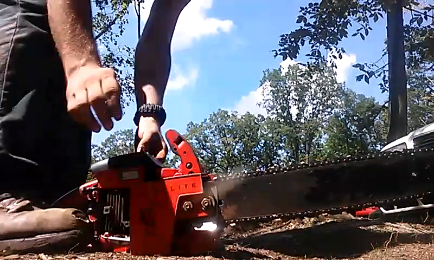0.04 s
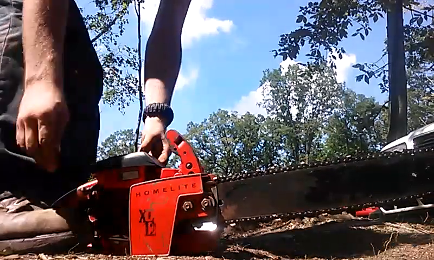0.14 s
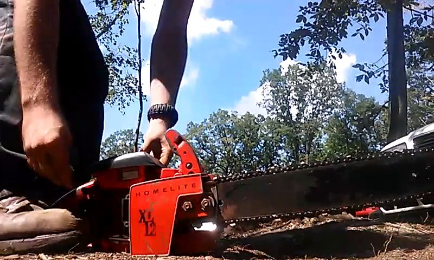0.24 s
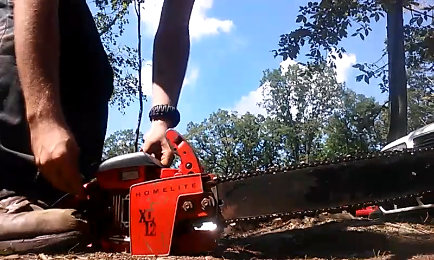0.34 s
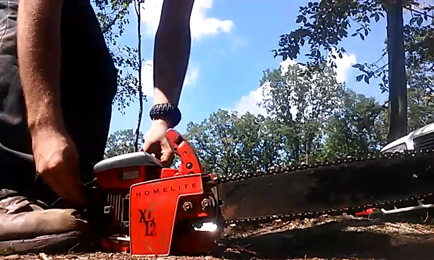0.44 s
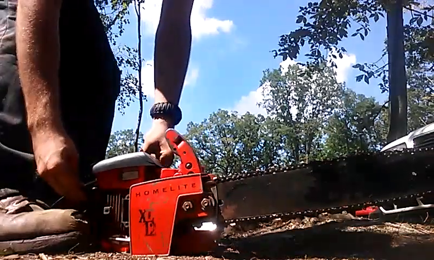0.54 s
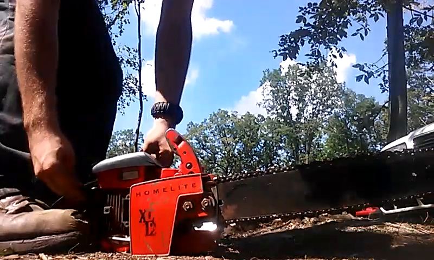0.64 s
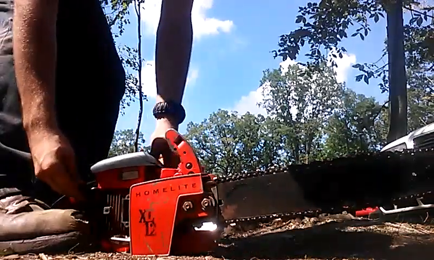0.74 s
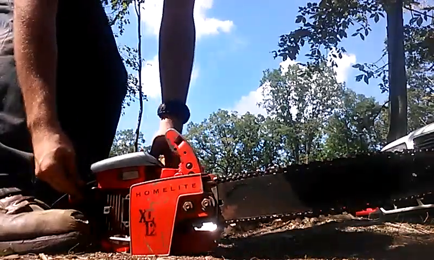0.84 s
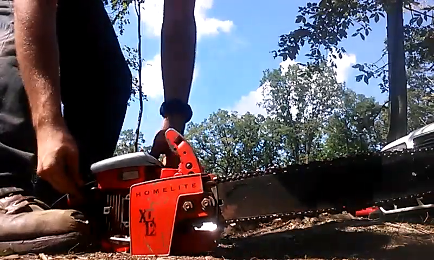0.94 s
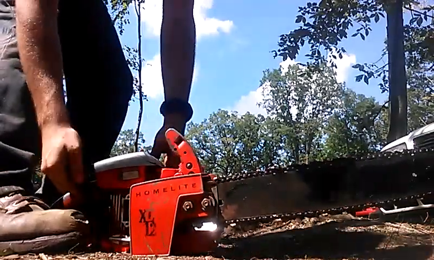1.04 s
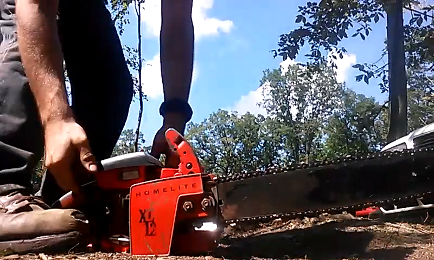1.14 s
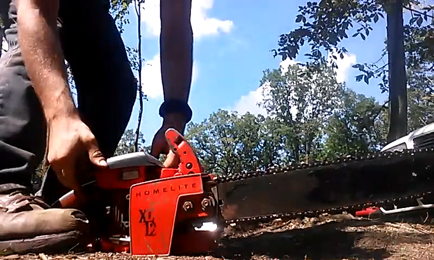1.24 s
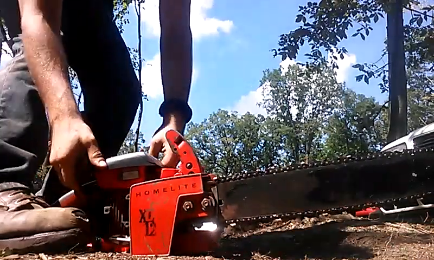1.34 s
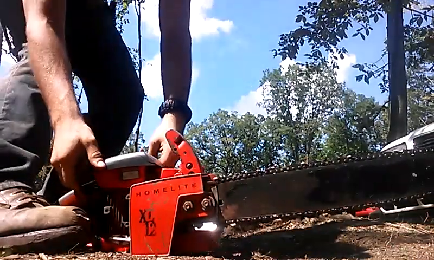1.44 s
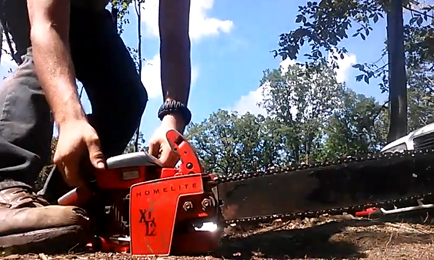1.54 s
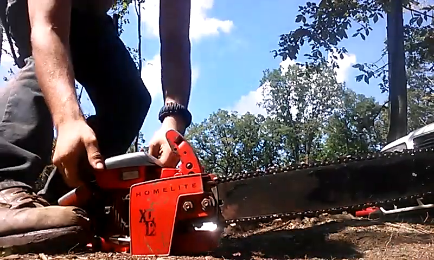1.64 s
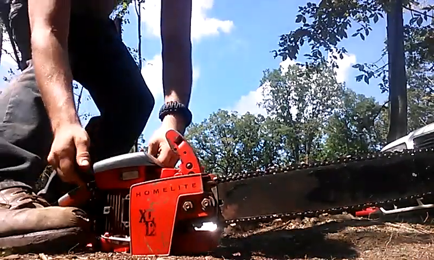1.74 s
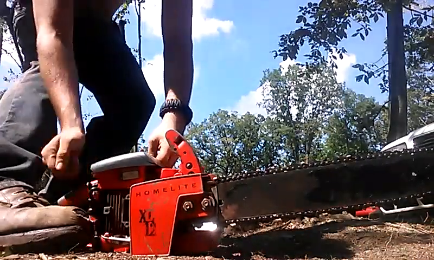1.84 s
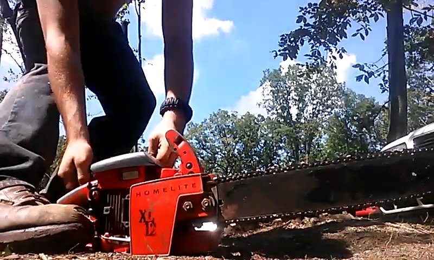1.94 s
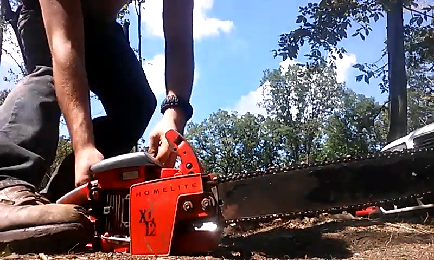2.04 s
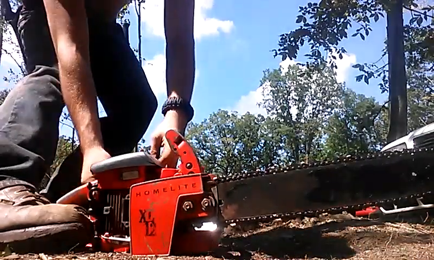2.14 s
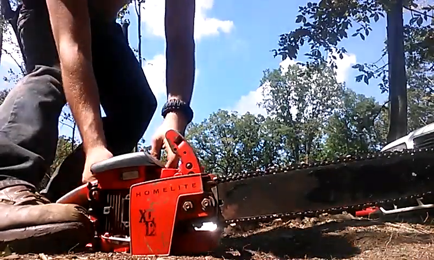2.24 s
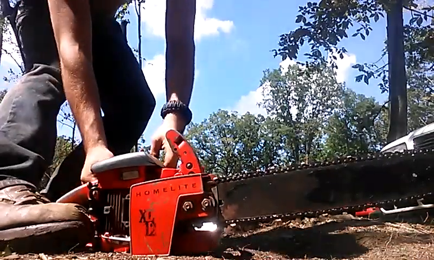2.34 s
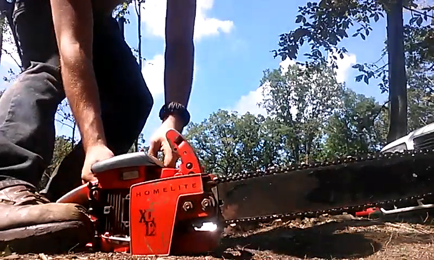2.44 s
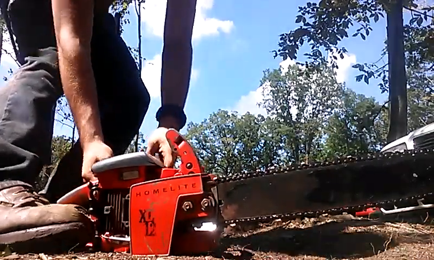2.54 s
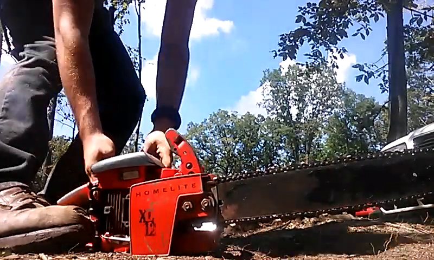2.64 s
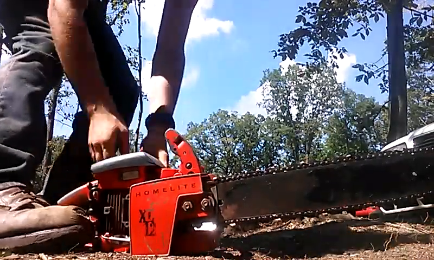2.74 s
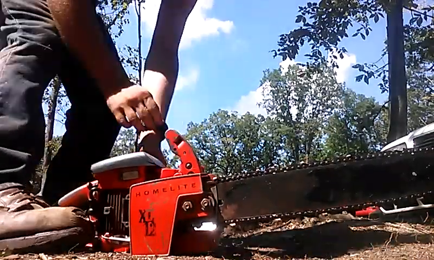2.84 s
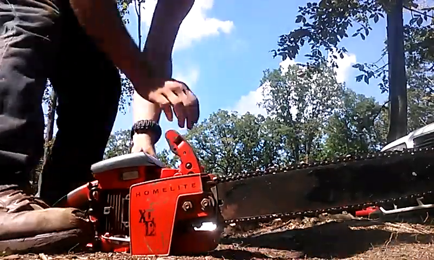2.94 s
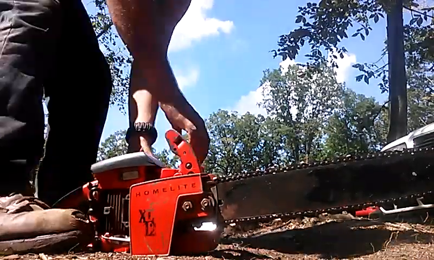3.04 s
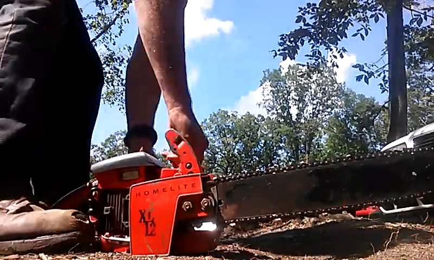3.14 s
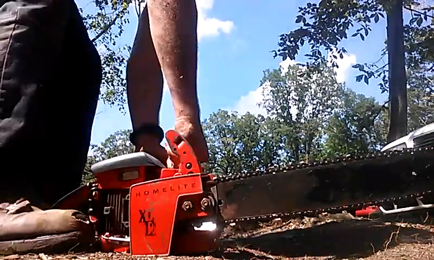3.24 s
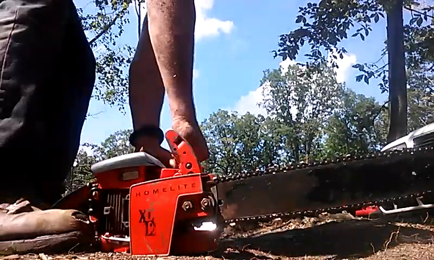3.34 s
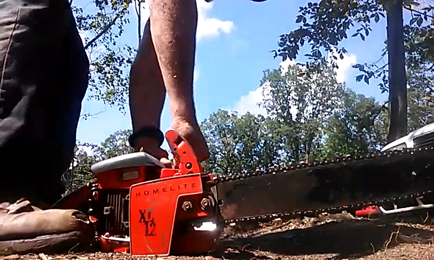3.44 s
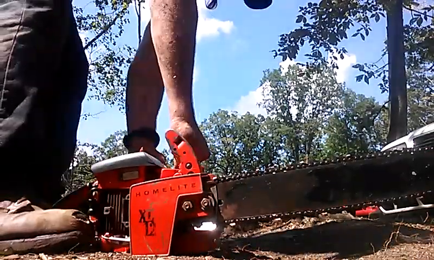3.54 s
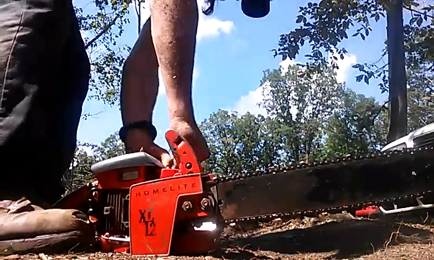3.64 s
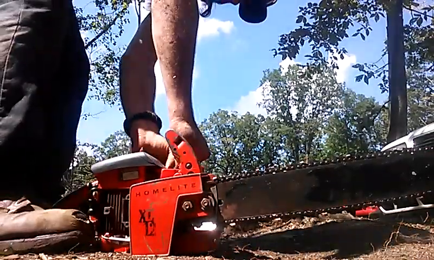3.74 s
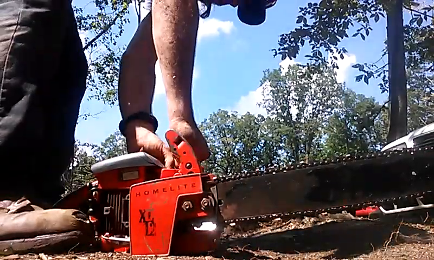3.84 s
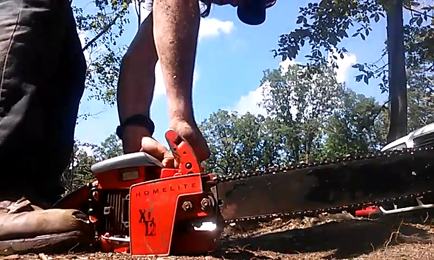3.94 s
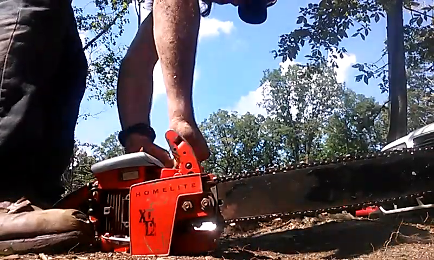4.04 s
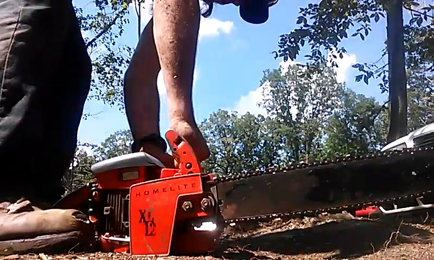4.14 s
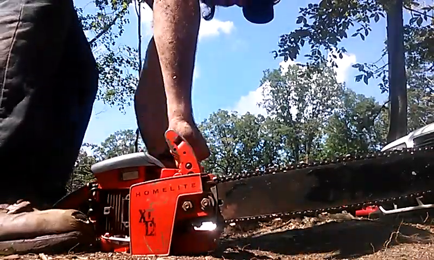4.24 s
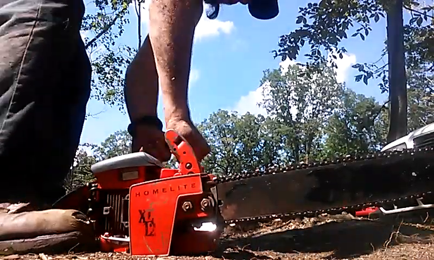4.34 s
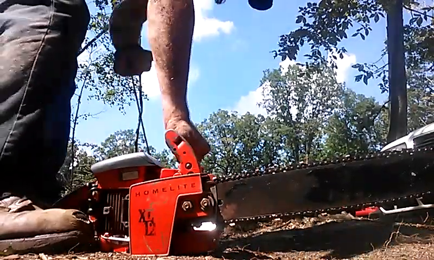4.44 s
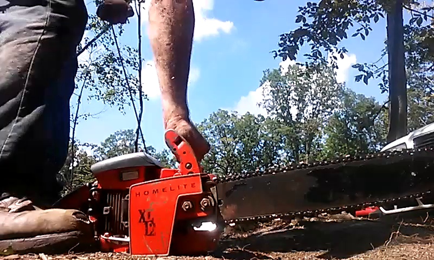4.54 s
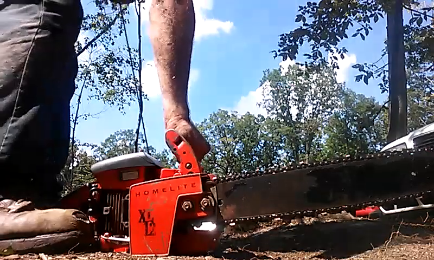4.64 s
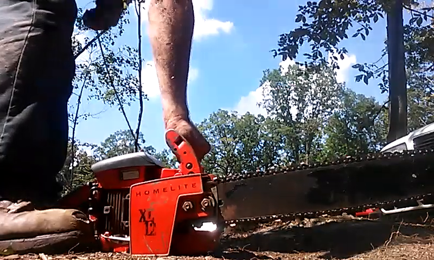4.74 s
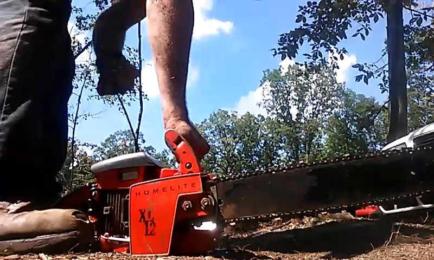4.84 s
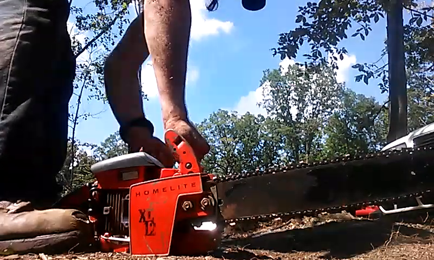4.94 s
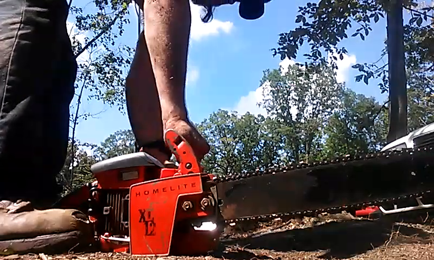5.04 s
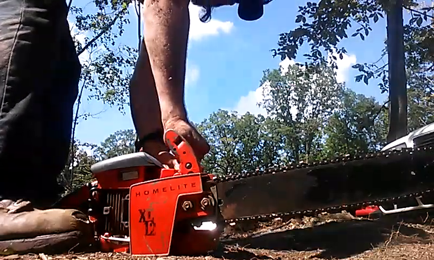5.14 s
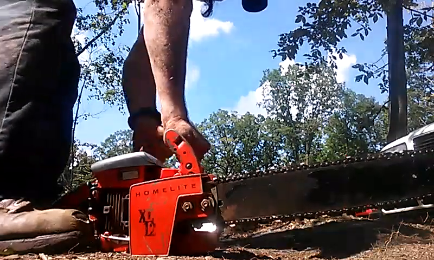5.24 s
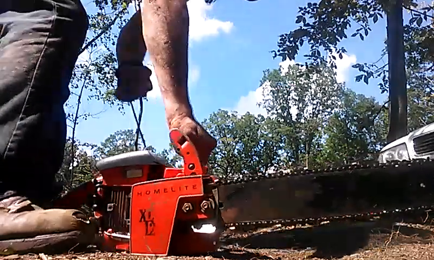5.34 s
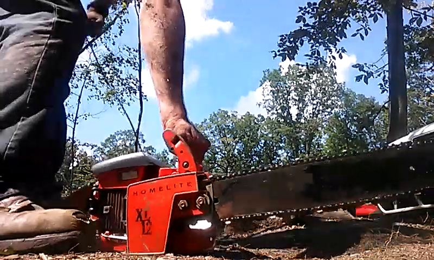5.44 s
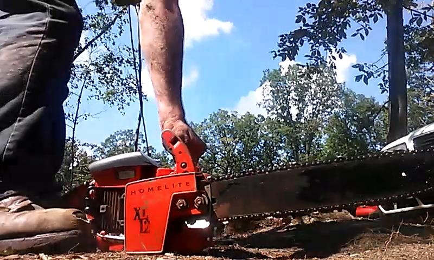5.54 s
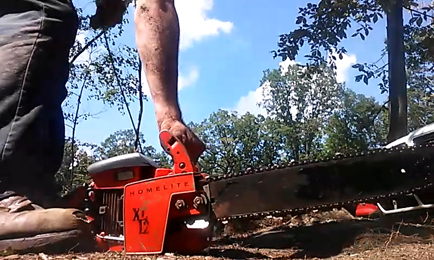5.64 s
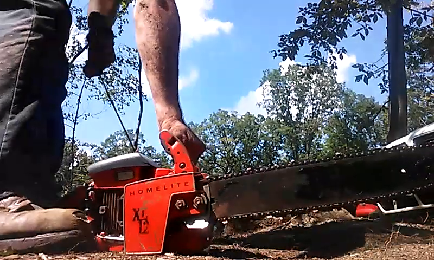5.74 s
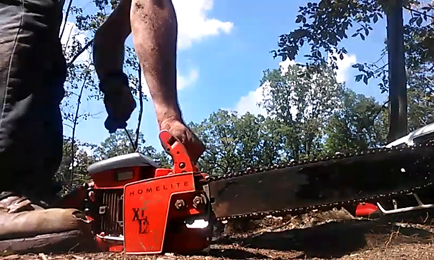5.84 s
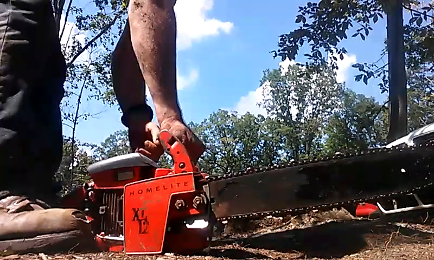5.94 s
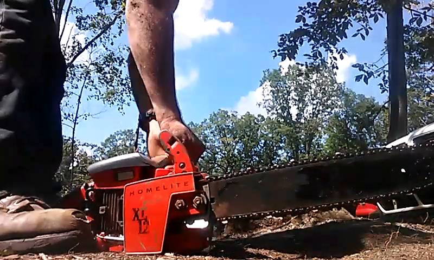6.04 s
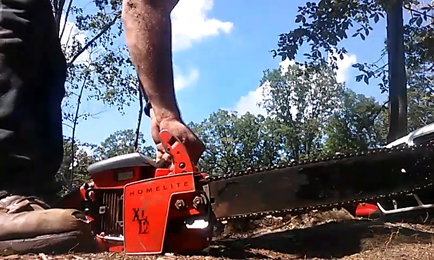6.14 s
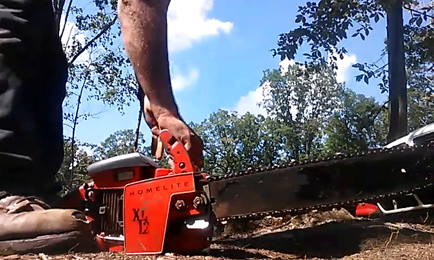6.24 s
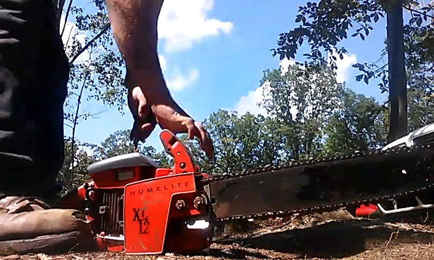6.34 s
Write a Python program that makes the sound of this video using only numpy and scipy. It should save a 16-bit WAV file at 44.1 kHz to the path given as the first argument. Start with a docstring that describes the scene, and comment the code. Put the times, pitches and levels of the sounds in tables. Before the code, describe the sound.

Outdoors, very close to the microphone, an unmuffled two-stroke chainsaw chugs down and stalls with a clank and brief metallic ring. Several seconds of near silence follow: faint pulsing insect, soft rustling, a dry switch click. Then a rope pull rattles and coughs without catching, a knock, and the next pull fires it into harsh, accelerating, overloaded popping that continues to the end.

```python
"""A chainsaw stalls and starts again

A two-stroke chainsaw without a muffler lies on the ground outdoors, close to the microphone. It coasts to a
stall, a switch clicks, a rope pull gives a few coughs, then it catches and gathers speed, firing every few turns.
Each turn of the crank is a set of short falling and rising tones plus hiss, as the exhaust port opens and shuts.
Firings add louder rings and gas noise, which overload the microphone. Shaped noise makes the metal parts,
an insect pulsing in the trees, rustling and air; the ground and trees send back faint echoes."""
import sys
import numpy as np
from scipy import signal
from scipy.fft import rfft, irfft, next_fast_len
from scipy.io import wavfile
from scipy.ndimage import uniform_filter1d

SR = 44100
rng = np.random.default_rng(int(sys.argv[2]) if len(sys.argv) > 2 else 0)


def int16_out(signal):
    """Quantize to a 16-bit WAV file."""
    q = np.round(np.clip(np.atleast_2d(signal).T, -1, 1) * 32767)
    wavfile.write(sys.argv[1], SR, q.astype(np.int16))


N = 281799  # length in samples


def amp(db):
    """Turn decibels into a gain."""
    return 10 ** (np.asarray(db) / 20)


def unit(x):
    """Scale a sound to an rms (average strength) of 1."""
    return x / np.sqrt(np.mean(x ** 2) + 1e-20)


def along(points, hz):
    """Read a curve of (f/Hz, value) points on a log frequency axis."""
    f, v = np.transpose(points)
    return np.interp(np.log(hz + 1), np.log(f + 1), v)


def level(rows):
    """Join (t/s, level/dB) rows with straight lines in dB and give a gain for each sample."""
    return amp(np.interp(np.arange(N) / SR, *np.transpose(rows)))


def filtered(x, response):
    """Multiply the spectrum of x by a response, a function of frequency."""
    size = next_fast_len(len(x) + SR // 2)
    spectrum = rfft(x, size) * response(np.fft.rfftfreq(size, 1 / SR))
    return irfft(spectrum, size)[:len(x)]


def noise(spectrum):
    """Noise of rms 1, coloured by (f/Hz, level/dB) points."""
    return unit(filtered(rng.standard_normal(N), lambda hz: amp(along(spectrum, hz))))


def resonant_noise(modes):
    """Noise of rms 1 in steep-sided resonances, each at half height one width away from its centre."""
    def peaks(f):
        return sum(amp(db) / (1 + ((f - hz) / width) ** 4) for hz, width, db in modes)
    return unit(filtered(rng.standard_normal(N), peaks))


def fade(t, attack, t60):
    """Rise, then die away by 60 dB in t60 seconds; silent before t = 0."""
    t = np.maximum(t, 0)
    return (1 - np.exp(-t / attack)) * np.exp(-np.log(1000) * t / t60)


def glide(t, start_hz, end_hz, settle):
    """Phase of a pitch that settles from one frequency to another."""
    return 2 * np.pi * (end_hz * t + (start_hz - end_hz) * settle * (1 - np.exp(-t / settle)))


def add(track, s, sound):
    """Mix a sound into the track at time s, in seconds."""
    start = round(s * SR)
    lo, hi = max(start, 0), min(start + len(sound), N)
    if hi > lo:
        track[lo:hi] += sound[lo - start:hi - start]


# Turns of the crank, fired or not, in stretches: (t/s, turns until the next row or 0 where it ends,
# share of a turn with the port open, relative level/dB)
CRANK_TURNS = [(-.010, 4, .53, 1), (.077, 4, .52, 1), (.172, 4, .52, 0), (.281, 3, .51, -1),
               (.377, 3, .49, -1), (.490, 1, .45, -1.5), (.536, 2, .49, -2), (.615, 1, .43, -2),
               (.662, 1, .41, -2), (.720, 1, .33, -3), (.798, 1, .5, -1.5), (.867, 0, .5, 0),
               (4.559, 1, .49, -2), (4.608, 1, .48, -2), (4.650, 3, .49, -2), (4.769, 1, .46, -1.5),
               (4.818, 1, .43, -1), (4.874, 1, .43, -3), (4.941, 2, .45, -1), (5.037, 1, .28, -2),
               (5.134, 1, .3, -5), (5.221, 0, .5, 0), (5.469, 1, .51, -2), (5.522, 3, .52, 0),
               (5.609, 2, .53, 1), (5.665, 2, .53, 1), (5.722, 3, .52, 2), (5.799, 3, .52, 2),
               (5.871, 3, .53, 3), (5.939, 3, .54, 3), (6.000, 2, .55, 3), (6.042, 3, .55, 4),
               (6.103, 4, .55, 4), (6.184, 3, .53, 4), (6.241, 3, .52, 4), (6.297, 2, .52, 4),
               (6.335, 2, .52, 4), (6.372, 1, .52, 4)]


def turns(slowing=1.035):
    """Each opening of the port as (t/s, time open/s, level/dB); within a row each turn outlasts the last."""
    ends = [row[0] for row in CRANK_TURNS[1:]] + [N / SR]
    for (s, count, share, db), end in zip(CRANK_TURNS, ends):
        lengths = slowing ** np.arange(round(count))
        for length in lengths * (end - s) / max(lengths.sum(), 1):
            yield s, length * share, db
            s += length


def whistle(t, hz, sweep, width):
    """Gas squeezed through the last slit of the port: a short, sliding tone."""
    phase = 2 * np.pi * hz * (t + sweep * t * t / 2) + rng.uniform(0, 2 * np.pi)
    return np.exp(-(t / width) ** 2) * np.sin(phase)


# Colour of the port's tones at the microphone: (f/Hz, level/dB)
PORT_TIMBRE = [(30, -7), (60, -3.5), (100, 1.5), (200, 4), (280, 3), (335, 7.5), (400, 2.5), (560, -1.5),
               (700, -4), (900, -1), (1200, 1.5), (2000, 2.5), (4000, -2), (7000, 2), (10000, -16.5)]
# Colour of escaping gas, also used by the firings: (f/Hz, relative level/dB per Hz)
JET_COLOUR = [(40, -16), (100, -4), (400, -0.5), (1200, 1), (2200, -6.5), (4500, -6.5), (6600, -13.5),
              (8200, -37.5), (15000, -45.5)]
# Colour of eddies in the open port, also used by the firings: (f/Hz, relative level/dB per Hz)
SWIRL_COLOUR = [(40, -22), (90, -4.5), (150, -5.5), (230, -0.5), (340, 1.5), (550, -2), (700, -7), (880, 2),
                (1150, -5), (2200, -15.5), (5000, -28), (9000, -59.5)]


def pumping(puff_db=7, cavity_db=-8.5, gulp_db=-11, thump_db=0, whistle_db=-8, crack_db=-12,
            push_db=-16, hiss_db=-23, snap_db=0, swirl_db=-16):
    """The cylinder is a cavity whose pitch falls as the port opens and rises again as it shuts."""
    out, flow, eddies = np.zeros((3, N))
    lead = .01  # seconds kept before the opening, for sounds that begin early
    t = np.arange(SR // 10) / SR - lead
    after = np.maximum(t, 0)
    for s, open_for, db in turns():
        size, pitch, squeeze, drift = rng.standard_normal(4)  # no two turns sound the same
        slow = (open_for / .013) ** .4  # a slow piston draws the sounds out
        shut = t - open_for + .0027  # time from the start of closing
        still_open = 1 / (1 + np.exp(shut / 0.0029))

        puff = fade(t, 0.00094, 0.013 * slow) * np.sin(glide(after, 900 * (1 + .02 * pitch), 285, .0022))
        cavity_hz = 325 / slow ** 0.35 * (1 + 0.031 * drift)
        cavity = fade(t, 0.0015, 0.06 * slow) * np.sin(2 * np.pi * cavity_hz * (t - .0018))
        # the crankcase empties
        gulp_hz = 195 / slow ** .8 * (1 + .04 * pitch)
        gulp = fade(t, 0.0011, .03 * slow) * np.sin(2 * np.pi * gulp_hz * t)

        swell = np.exp(-np.where(shut < 0, -shut / (0.0015 * slow), shut / 0.00068))
        thump = -np.cos(glide(np.abs(shut), 950, 300, 0.0011)) * swell
        closing_sweep = (140 + 30 * drift) / slow
        closing = whistle(t - open_for, 3550 * (1 + .04 * squeeze), closing_sweep, .0012 * slow)
        opening = whistle(t + .0003, 3450 * (1 + .08 * pitch), -140, 0.0012 * slow) / slow
        # the piston's edge passes the port's edge
        snap = fade(t + 0.002 * slow, .00003, 0.00092) - fade(shut - .0015, .00003, .0008)
        push = fade(t, .002, 0.0084) - fade(shut, .002, 0.013) * .5

        body = slow * (amp(cavity_db) * cavity + amp(gulp_db) * gulp)
        pulse = amp(puff_db + 1.2 * size) * puff + still_open * body + amp(push_db) * push
        edges = amp(thump_db) * thump + amp(whistle_db + 1.5 * squeeze) * closing
        edges += amp(crack_db) * opening + amp(snap_db) * snap
        edge_gain = amp(-45 * max(slow - 1.3, 0))  # a creeping piston shuts the port quietly
        add(out, s - lead, amp(db) * pulse + edge_gain * edges)

        hiss = fade(t + 0.0036, 0.00045, 0.07) + fade(shut, 0.00059, .04)
        add(flow, s - lead, amp(db + hiss_db) * slow * hiss)
        swirl = still_open * fade(t + .002, 0.0017, 0.12)
        add(eddies, s - lead, amp(db + swirl_db) * slow ** 3 * swirl)
    tones = filtered(out, lambda hz: amp(along(PORT_TIMBRE, hz)))
    return tones + flow * noise(JET_COLOUR) + eddies * noise(SWIRL_COLOUR)


# Charges that ignite: (t/s, relative blast level/dB, reference f/Hz for the ring's slide)
IGNITIONS = [(.012, -0.5, 900), (.078, 4, 900), (.172, 0, 850), (.280, 5, 850), (.376, 6.5, 900),
             (.535, 9, 900), (.866, 4, 1500), (4.939, 9, 950), (5.220, 3.5, 1350), (5.521, 10, 950),
             (5.608, 9, 950), (5.664, 7, 950), (5.721, 11.5, 1000), (5.798, 11.5, 1000),
             (5.870, 11.5, 1000), (5.938, 13, 1000), (6.000, 8.5, 950), (6.041, 11, 1000),
             (6.102, 11, 1000), (6.142, 7, 950), (6.183, 14, 1050), (6.240, 15, 1050), (6.297, 12, 1050),
             (6.334, 10, 1050), (6.371, 11, 1050)]


def firings(ring_db=4, jet_db=-13, roar_db=-28, swirl_db=-17):
    """Hot gas bursts from the port: a higher, louder ring that sinks as it cools, a jet and eddies."""
    out, flow, eddies = np.zeros((3, N))
    t = np.arange(SR // 6) / SR
    for s, db, hz in IGNITIONS:
        end_hz = hz * .55 * (1 + .1 * rng.standard_normal())
        ring = fade(t, 0.0019, .018) * np.sin(glide(t, hz * 1.3, end_hz, .004))
        add(out, s, amp(db + ring_db) * ring)
        tight = (hz / 1000) ** 2  # a barely open port rings higher and hisses more
        gas = amp(jet_db) * fade(t, 0.00017, 0.03) + amp(roar_db) * fade(t, 0.0066, 0.093)
        add(flow, s, amp(db) * tight * gas)
        add(eddies, s, amp(db + swirl_db) * fade(t, 0.0032, 0.14))
    return out + flow * noise(JET_COLOUR) + eddies * noise(SWIRL_COLOUR)


# Chain, bearings and starter rope: (t/s, level/dB)
RATTLE_LEVEL = [(0, -21.5), (.3, -21.5), (.6, -21), (.76, -23), (.85, -31.5), (.9, -28.5), (.93, -42),
                (1.02, -54.5), (1.05, -76), (1.3, -95), (4.3, -98), (4.47, -72.5), (4.51, -48),
                (4.52, -36.5), (4.55, -30.5), (4.57, -17.5), (4.75, -19.5), (4.85, -21.5), (4.92, -27),
                (4.96, -18.5), (5.07, -23), (5.12, -20.5), (5.2, -28.5), (5.25, -26), (5.28, -41.5),
                (5.32, -48.5), (5.39, -45.5), (5.44, -40.5), (5.46, -27), (5.48, -20), (5.8, -21.5),
                (6.15, -20.5), (6.39, -16)]
# Colour of the chatter: (f/Hz, relative level/dB per Hz)
CHATTER_COLOUR = [(40, -23), (90, -10), (250, -1.5), (600, -1.5), (1200, 2.5), (2000, -6), (3000, -12),
                  (4500, -14), (6600, -20.5), (7800, -43), (15000, -52)]


def rattle(grain_db=3):
    """Uneven chatter of chain, bearings and starter rope, following a typed level curve."""
    chatter = unit(uniform_filter1d(rng.standard_normal(N), SR // 400))  # smoothed over 2.5 ms
    return level(RATTLE_LEVEL) * unit(amp(grain_db * chatter) * noise(CHATTER_COLOUR))


# The starter pawls scrape on their cup: (t/s, relative level/dB)
PAWL_TOUCHES = [(.709, -13), (.772, -10.5), (.856, -26), (4.639, -18), (4.673, -14), (4.743, -19.5),
                (4.754, -20), (4.822, -23), (4.870, -13), (5.080, -5), (5.096, -7), (5.109, -15.5),
                (5.122, -24), (5.140, -17), (5.155, -16), (5.173, -16), (5.191, -14.5), (5.532, -12)]
# Resonances of the scrape: (f/Hz, width/Hz, relative level/dB)
SCRAPE_MODES = [(3900, 900, -5.5), (4950, 280, 1), (5455, 200, -7.5), (11400, 800, -27.5)]


def starter(boost_db=10):
    """Each touch of the pawls draws a short metallic squeal: a burst of resonant noise."""
    touch = np.zeros(N)
    t = np.arange(SR // 8) / SR
    for s, db in PAWL_TOUCHES:
        add(touch, s, amp(db + boost_db) * fade(t, 0.0034, .03))
    return touch * resonant_noise(SCRAPE_MODES)


# The clutch sings as the speed rises: (t/s, level/dB)
CLUTCH_LEVEL = [(0, -120), (5.45, -120), (5.5, -61.5), (5.85, -57), (6.1, -36), (6.2, -28.5), (6.39, -24.5)]
# Resonances of the clutch: (f/Hz, width/Hz, relative level/dB)
SINGING_MODES = [(4140, 220, 2), (6440, 210, -1), (9400, 110, -15)]


def clutch():
    """The clutch sings once the saw runs: resonant noise following a typed, rising level curve."""
    return level(CLUTCH_LEVEL) * resonant_noise(SINGING_MODES)


# Switch, handle and chain knocks: (t/s, relative level/dB)
KNOCK_TIMES = [(.884, -4.5), (0.905, -14), (.940, -34), (.994, -41), (1.017, -40), (1.666, -48),
               (1.693, -19.5), (1.702, -31), (2.534, -55), (3.487, -34), (3.621, -56.5), (3.774, -60.5),
               (4.486, -46), (4.513, -24.5), (5.232, -5), (5.257, -14), (5.342, -8.5), (5.404, -24.5)]
# Colour of the casing: (f/Hz, relative level/dB per Hz)
CASING_COLOUR = [(150, -41), (450, -32), (620, -5.5), (830, -16), (1300, 1.5), (1700, -3), (2100, -8),
                 (2900, -7), (3700, -14.5), (5500, -10.5), (7100, -31), (15000, -46)]


def knocks(trim_db=-4):
    """Dry knocks on the casing: short noise bursts with a weak, longer tail."""
    blows = np.zeros(N)
    t = np.arange(SR // 2) / SR
    for s, db in KNOCK_TIMES:
        add(blows, s, amp(db + trim_db) * (fade(t, .0005, 0.034) + 0.025 * fade(t, .005, .3)))
    return blows * noise(CASING_COLOUR)


# Tones of the guide bar: (f/Hz, level/dB, t60/s)
BAR_TONES = [(1800, -38, 0.41), (2694, -50.5, .45), (591, -53.5, .3)]


def guide_bar(stall=.867):
    """The guide bar, jolted by the stall (time in s), rings on in a few dying tones."""
    bar = np.zeros(N)
    t = np.arange(SR // 2) / SR
    for hz, db, t60 in BAR_TONES:
        add(bar, stall, amp(db) * fade(t, .002, t60) * np.sin(2 * np.pi * hz * t))
    return bar


def echo(x, decay, delay):
    """A diffuse answer, delayed in seconds: noise in which each frequency dies at its own speed."""
    hz, t, z = signal.stft(rng.standard_normal(SR), SR, nperseg=128)
    dying = np.exp(-np.log(1000) * t / along(decay, hz)[:, None])
    tail = signal.istft(z * dying, SR, nperseg=128)[1]
    delayed = np.pad(x, (round(delay * SR), 0))
    return signal.fftconvolve(delayed, tail / np.linalg.norm(tail))[:N]


# Echo of the ground and nearby things: (f/Hz, t60/s)
YARD_DECAY = [(100, 0.035), (400, 0.23), (1500, 0.032), (8000, .05)]
# Echo of the trees: (f/Hz, t60/s)
TREE_DECAY = [(100, 0.89), (500, .9), (2000, .8), (8000, 0.36)]


def surroundings(saw, yard_db=-18, trees_db=-51):
    """Sound scatters from the ground almost at once and returns faintly from the trees a little later."""
    yard = amp(yard_db) * echo(saw, YARD_DECAY, delay=.003)
    return yard + amp(trees_db) * echo(saw, TREE_DECAY, delay=.04)


# An insect's buzzes: (t/s at the middle, relative level/dB)
INSECT_BUZZES = [(1.09, -64), (1.32, -70), (1.55, -68), (1.79, -65.5), (2.07, -66), (2.31, -66),
                 (2.57, -66), (2.86, -66.5), (3.09, -62.5), (3.34, -63), (3.57, -65), (3.81, -70),
                 (4.05, -69), (4.30, -66)]


def insect(buzz_length=0.075, buzz_db=-2):
    """Pulses of narrow noise near 4780 Hz; buzz_length (s) sets how far each one spreads."""
    t = np.arange(N) / SR
    buzz = sum(amp(db + buzz_db) * np.exp(-np.abs((t - s) / buzz_length) ** 3) for s, db in INSECT_BUZZES)
    return buzz * resonant_noise([(4780, 180, 0)])


# Tiny, bright ticks: (t/s, level/dB)
TICK_TIMES = [(2.128, -52), (2.180, -50.5), (2.227, -52), (2.283, -52.5)]


def ticks():
    """Very short bursts of noise that is strongest in the treble."""
    t = np.arange(N) / SR
    bursts = sum(amp(db) * fade(t - s, .0001, .012) for s, db in TICK_TIMES)
    return bursts * noise([(3000, -20), (9000, 0)])


# Rustling of clothes and leaves: (t/s, relative level/dB)
RUSTLE_LEVEL = [(0, -80.5), (1.15, -68.5), (1.35, -82), (1.65, -84.5), (1.75, -63), (1.95, -74),
                (2.25, -77), (2.42, -85.5), (2.55, -74), (2.7, -85), (3.05, -82), (3.3, -68.5), (3.52, -62),
                (3.7, -77), (3.95, -84), (4.2, -85), (4.27, -77), (4.4, -86.5)]
# Colour of the rustling: (f/Hz, relative level/dB per Hz)
LEAF_COLOUR = [(30, -13), (100, 0.5), (250, -1.5), (600, -7.5), (1100, -9.5), (1450, -3), (2000, -7.5),
               (5500, -12), (8000, -19.5), (15000, -24)]


def rustling(rustle_db=-1):
    """Clothes and leaves brush softly: coloured noise that swells and sinks."""
    return amp(rustle_db) * level(RUSTLE_LEVEL) * noise(LEAF_COLOUR)


# Colour of the still air: (f/Hz, relative level/dB per Hz)
AIR_COLOUR = [(25, -18), (60, -12), (480, -13.5), (2500, -12.5), (4300, -14), (4780, -7), (5400, -18.5),
              (15000, -19.5)]


def still_air(air_db=-70.5):
    """A faint, steady bed of coloured noise."""
    return amp(air_db) * noise(AIR_COLOUR)


def scene():
    """The saw, its echoes from the ground and trees, and the quiet outdoors."""
    saw = pumping() + firings() + rattle() + starter() + clutch() + knocks() + guide_bar()
    outdoors = insect() + ticks() + rustling() + still_air()
    return (saw + surroundings(saw) + outdoors)[None]


def record(dry, ceiling=.97, top_hz=16000):
    """The loudest peaks flatten at the ceiling, then everything from top_hz up is removed."""
    clipped = np.clip(dry[0], -ceiling, ceiling)
    return filtered(clipped, lambda hz: hz < top_hz)[None]


dry = scene()
out = record(dry)
int16_out(out)
```